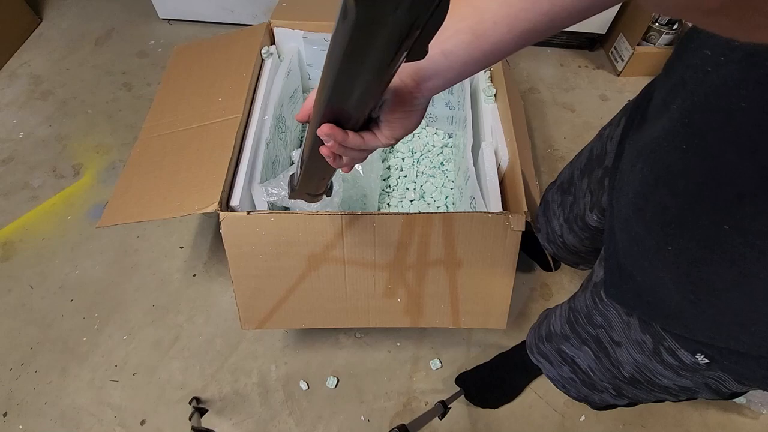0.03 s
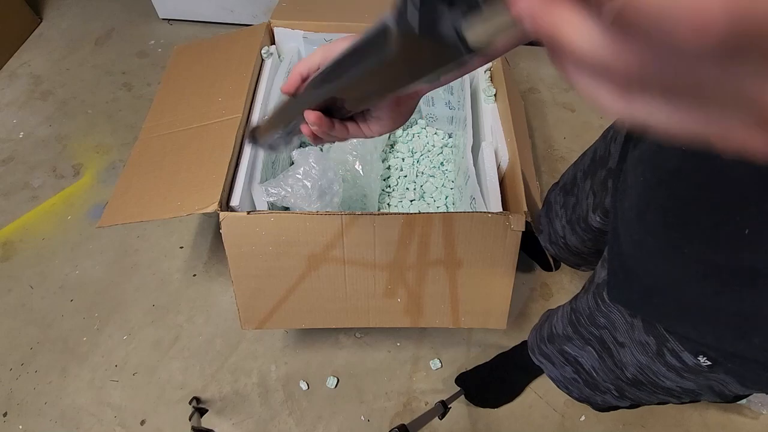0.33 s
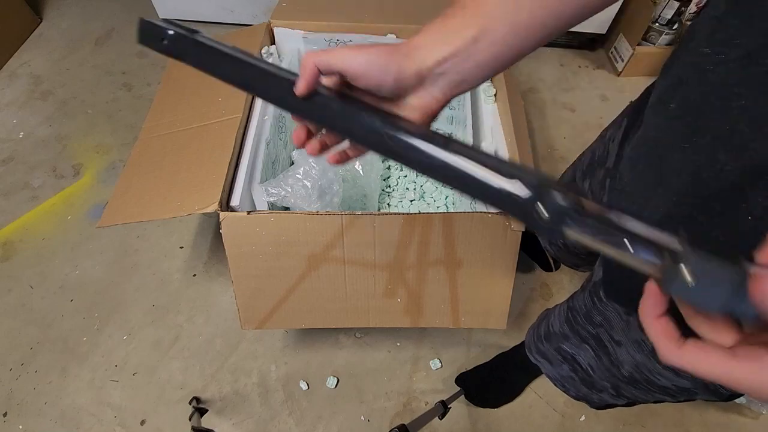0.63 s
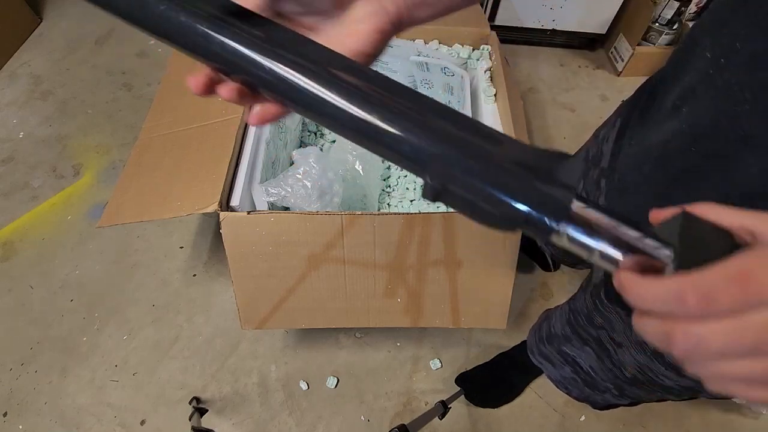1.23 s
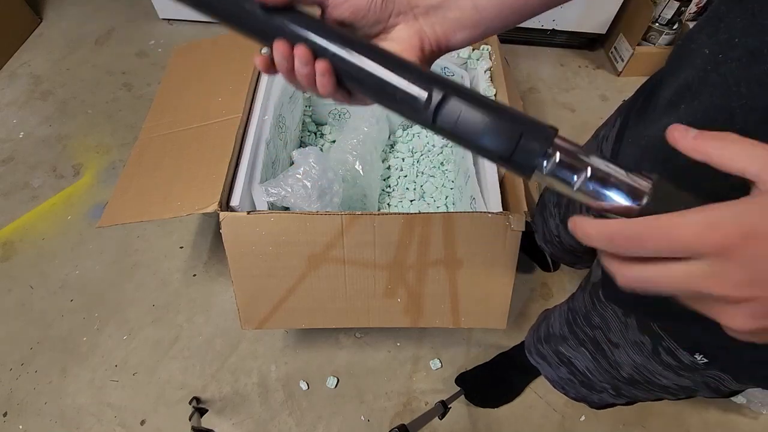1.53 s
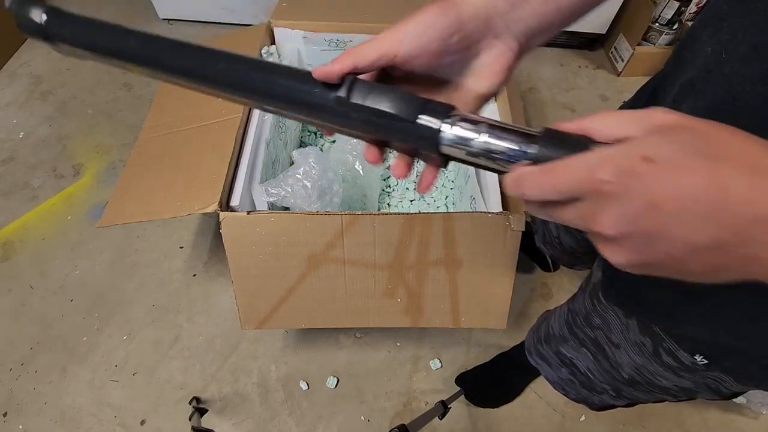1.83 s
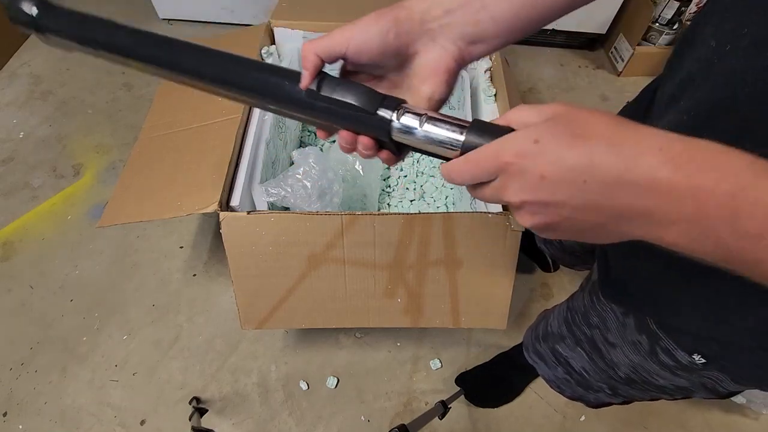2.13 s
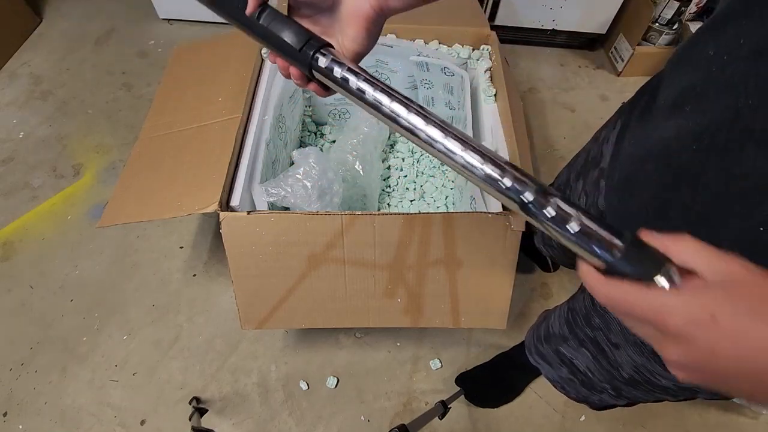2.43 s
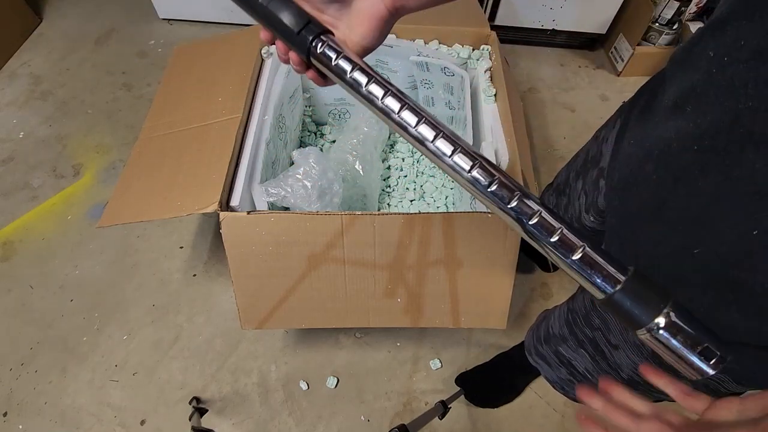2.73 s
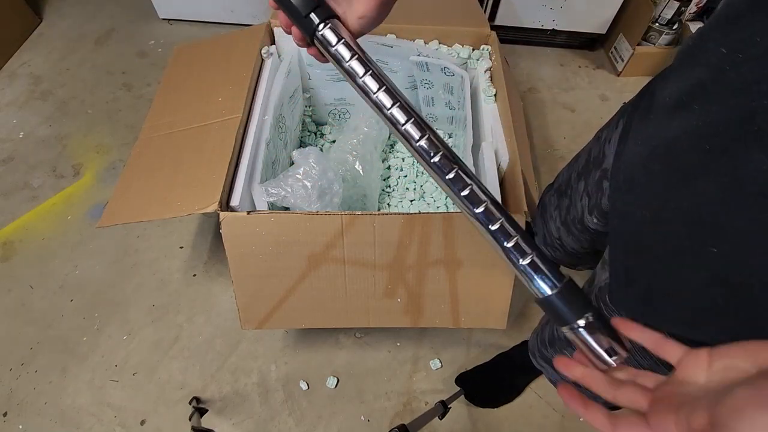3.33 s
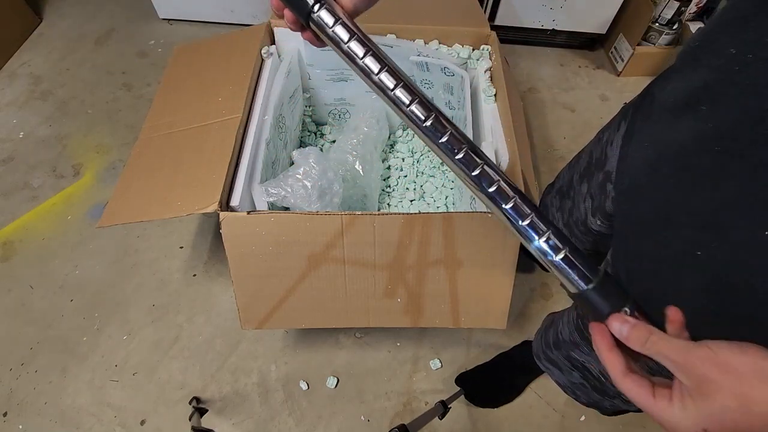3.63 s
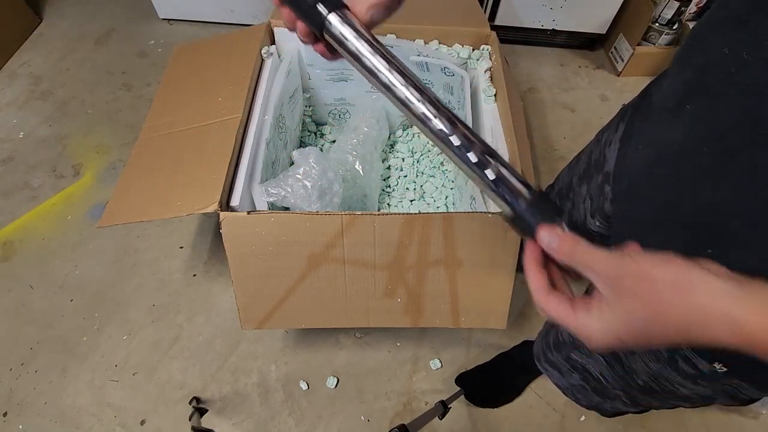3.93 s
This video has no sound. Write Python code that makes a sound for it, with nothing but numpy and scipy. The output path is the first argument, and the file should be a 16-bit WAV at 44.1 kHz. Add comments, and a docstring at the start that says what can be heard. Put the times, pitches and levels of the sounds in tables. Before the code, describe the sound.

A telescoping metal tube ratchets open close to the microphone after some soft handling. It clacks loudly against its stop, knocks twice in its plastic collar, then slides and clicks twice more, over a small room's low machine hum.

```python
"""Notched metal tube pulled out by hand

Close up, in a small hard-walled room with a machine humming. Hands rub and tap the tube; it slides
and its sprung catch rattles over the notches. It clacks against its end stop, knocks twice in its
plastic collar, slides again and clicks over two more notches. Metal contacts are a burst of chatter
plus the tube's modes; sliding and rubbing are dense tiny slips."""
import sys
import numpy as np
from scipy import signal
from scipy.fft import rfft, irfft
from scipy.io import wavfile

SR = 44100
rng = np.random.default_rng(int(sys.argv[2]) if len(sys.argv) > 2 else 0)


def wav_record(signal):
    """Record a signal, one row per channel, as 16-bit PCM in the file named by sys.argv[1]."""
    frames = np.transpose(np.atleast_2d(signal))
    bounded = np.clip(frames, -1, 1)
    # unit amplitude maps onto the largest positive 16-bit level
    quanta = np.round(bounded * 32767).astype(np.int16)
    wavfile.write(sys.argv[1], SR, quanta)


N = 176400
T = np.arange(N) / SR
HIT_T = T[:N // 16]
HIT_S = 0.005  # hit level = rms with all its energy in this span
FRICTION_WIDE_HZ = 4930

# spectrum of the catch on the tube (frequency [Hz], gain [dB])
CATCH_COLOUR = [(200, -19), (1100, -16), (2000, -1), (3300, -2.5), (5400, 0.5), (7500, 1), (8900, -2.5),
                (10000, -0.5), (13000, 1.5), (15500, -3.5)]
# spectrum of the end stop (frequency [Hz], gain [dB])
STOP_COLOUR = [(60, -14.5), (190, 1), (480, -16), (850, -9), (1070, -3.5), (1650, -6), (2100, -1),
               (2700, 2), (3050, -12), (3500, -1), (4200, -15), (5600, -9), (6400, -13), (6950, -18.5),
               (7700, -9), (10300, -8.5), (13000, -11.5), (13900, -20), (15500, -9)]


def undb(db):
    """Decibels to gain."""
    return 10 ** (np.asarray(db) / 20)


def unit(x):
    """Scale to a mean channel energy of 1."""
    return x / np.sqrt(np.mean(np.sum(x ** 2, axis=-1)))


def pan(db):
    """Stereo gains, left louder by db."""
    return undb(np.array([[db], [-db]]) / 2)


def at_hz(points, hz):
    """Read a table on a log-frequency axis."""
    knots_hz, values = np.array(points).T
    return np.interp(np.log(hz + 1), np.log(knots_hz), values)


def colour(x, points, tilt_db_oct=0):
    """Minimum-phase filter from a spectrum table, tilted above 500 Hz."""
    n = x.shape[-1]
    hz = np.fft.rfftfreq(n, 1 / SR)
    gain_db = at_hz(points, hz) + tilt_db_oct * np.log2(np.maximum(hz, 500) / 500)
    cepstrum = irfft(np.log(undb(gain_db)), n)
    return irfft(rfft(x) * np.exp(rfft(2 * cepstrum[:n // 2], n)), n)


def spread(pair, wide_hz):
    """Two unrelated signals to stereo: alike in the bass, unrelated above wide_hz."""
    n = pair.shape[-1]
    hz = np.fft.rfftfreq(n, 1 / SR)
    side = irfft(rfft(pair[1]) * hz / np.hypot(hz, wide_hz), n)
    return np.array([pair[0] + side, pair[0] - side])


def shape_noise(pair, points, wide_hz, tilt_db_oct=0):
    """Noise pair to coloured stereo, rms 1."""
    return unit(spread(colour(pair, points, tilt_db_oct), wide_hz)) * np.sqrt(pair.shape[-1])


def add(out, start_s, x):
    """Mix x in at start_s."""
    i = int(start_s * SR)
    out[:, i:i + x.shape[1]] += x[:, :N - i]


def contact_point(hz, scatter_db=3.5, step_hz=520):
    """Each place of contact favours its own resonances: random gain along frequency."""
    knots_hz = np.arange(0, SR / 2, step_hz)
    ripple = np.interp(hz, knots_hz, rng.standard_normal(len(knots_hz)))
    return undb(scatter_db * ripple * hz / np.hypot(hz, 2500))


def tube_ring(grip_per_s, detune=0.012, scatter_db=4):
    """Tube modes, varied per strike and damped further by the grip."""
    # free modes (frequency [Hz], level [dB], t60 [s])
    modes = [(1084, -2.5, 0.18), (1422, 1, 0.3), (1830, -8.5, 0.079), (2120, -10.5, 0.36),
             (2750, -13, 0.092), (3840, -2.5, .08), (5155, -3, 0.08), (5300, -1.5, .14), (7670, -2, 0.28),
             (7560, 1, 0.13), (10230, 0.5, 0.2), (11870, -1, .11), (15300, 7.5, .1), (15500, -6, .1)]
    ring = 0
    for hz, db, t60_s in modes:
        cycles = hz * (1 + detune * rng.standard_normal()) * HIT_T + rng.random((2, 1))
        gain = undb(db + scatter_db * rng.standard_normal())
        decay = np.exp(-np.log(1000) * HIT_T * (1 / t60_s + grip_per_s))
        ring = ring + gain * np.sin(2 * np.pi * cycles) * decay
    return ring


def hit(points, db, tilt_db_oct, decay_s, ring_db, wide_hz=3000, grip_per_s=20):
    """One contact: the faces chatter briefly and the tube rings."""
    n = len(HIT_T)
    envelope = np.exp(-HIT_T / decay_s) * (1 - np.exp(-2 * HIT_T / decay_s))
    chatter = rfft(rng.standard_normal((2, n)) * envelope)
    spectrum = contact_point(np.fft.rfftfreq(n, 1 / SR)) * chatter / np.abs(chatter)
    crack = irfft(spectrum, n) * np.exp(-HIT_T / (10 * decay_s))
    strike = unit(crack) + undb(ring_db) * unit(tube_ring(grip_per_s))
    stereo = spread(colour(strike, points, tilt_db_oct), wide_hz)[:, :n // 2]
    return np.array([unit(side) for side in stereo]) * undb(db) * np.sqrt(HIT_S * SR)


def friction(curve, points, grain_db, rate_hz):
    """Dense tiny slips of uneven size under a level curve; silent outside it."""
    grain_index = np.linspace(0, T[-1] * rate_hz, N // 10)
    coarse_grain = np.interp(grain_index, np.arange(N), rng.standard_normal(N))
    grain = np.interp(T, np.linspace(0, T[-1], N // 10), coarse_grain)
    slips = rng.standard_normal((2, N)) * undb(grain_db * grain)
    times_s, db = np.array(curve).T
    envelope = undb(np.interp(T, times_s, db)) * (T >= times_s[0]) * (T <= times_s[-1])
    return shape_noise(slips, points, FRICTION_WIDE_HZ) * envelope


def background():
    """Ventilation noise and steady motor hum."""
    # ventilation spectrum (frequency [Hz], relative density [dB])
    air_colour = [(22, -29), (38, -18), (52, 1), (80, -2), (150, -3.5), (210, 2), (290, -4.5), (360, -5),
                  (500, -10.5), (700, -7.5), (950, -17.5), (1450, -20), (2500, -31.5), (5000, -40.5),
                  (7500, -44.5), (9500, -60), (16000, -58.5)]
    # motor tones (frequency [Hz], level [dB])
    tones = [(58.5, -54.5), (117.2, -58.5), (198, -61), (358, -63.5), (644, -70.5), (704, -68.5)]
    air = shape_noise(rng.standard_normal((2, N)), air_colour, wide_hz=553) * undb(-50)
    hum = sum(np.sqrt(2) * undb(db) * np.sin(2 * np.pi * (hz * T + rng.random())) for hz, db in tones)
    return air + hum


def hands():
    """Fingers rub along the tube, tap it and scuff it as they change grip."""
    # rubbing (time [s], level [dB])
    rub = [(.42, -79), (.56, -63.5), (.72, -76), (.88, -68.5), (1.05, -68.5), (1.19, -63), (1.33, -58),
           (1.47, -61), (1.51, -68.5), (1.68, -61.5), (1.8, -61.5), (2.1, -58.5), (2.2, -53), (2.27, -90)]
    # spectrum of skin on metal (frequency [Hz], gain [dB])
    rub_colour = [(300, 10), (1300, 4), (2500, -1), (4500, -4.5), (7500, -6), (8800, -11.5), (12500, -18.5),
                  (15500, -15)]
    # taps of fingers and fittings (time [s], level [dB], tilt [dB/oct])
    taps = [(0.545, -60, 1), (0.927, -56.5, -1.5), (1.2982, -40, 2.5), (1.48, -56.5, 0), (1.7024, -56, -2),
            (1.7468, -54, -2.5), (1.77, -40.5, 0.5), (2.168, -48, -7.5), (2.309, -41, -3.5),
            (2.7372, -35.5, 2), (2.748, -45, -7.5), (2.885, -66, 2.5), (3.6575, -38, .7), (3.67, -43.5, 1),
            (3.748, -52, 1), (3.842, -54, 0)]
    # tap spectrum (frequency [Hz], gain [dB])
    tap_colour = [(150, -10.5), (400, -16.5), (1100, 2.5), (2400, 4.5), (3200, 1.5), (5200, 4),
                  (7500, -0.5), (9000, -1), (15500, -10.5)]
    # skin scuffs (peak time [s], half length [s], level [dB], tilt [dB/oct])
    scuffs = [(0.543, .016, -55.5, 7.5), (0.622, 0.032, -62, 13), (0.773, 0.021, -63, 3.5),
              (.828, 0.022, -57, 10), (1.295, .01, -46.5, -0.5), (1.435, 0.039, -60.5, 6),
              (1.606, 0.039, -55.5, -2.5), (1.786, 0.035, -54, 0), (1.869, .025, -56, 8.5),
              (2.285, 0.027, -54, 1)]
    out = friction(rub, rub_colour, grain_db=1.5, rate_hz=300)
    for time_s, db, tilt_db_oct in taps:
        add(out, time_s, hit(tap_colour, db, tilt_db_oct, decay_s=0.0015, ring_db=-9))
    centre_s = HIT_T[-1] / 2
    for peak_s, half_s, db, tilt_db_oct in scuffs:
        hiss = shape_noise(rng.standard_normal((2, len(HIT_T))), rub_colour, FRICTION_WIDE_HZ, tilt_db_oct)
        swell = np.exp(-((HIT_T - centre_s) / half_s) ** 2)
        add(out, peak_s - centre_s, hiss * undb(db) * swell)
    return out


def sliding():
    """Metal scrapes in the sleeve: a long pull, later a short nudge."""
    # pull (time [s], level [dB])
    pull = [(2.28, -67), (2.3, -48), (2.37, -38), (2.47, -40.5), (2.58, -39), (2.63, -53.5), (2.68, -72.5),
            (2.725, -74.5), (2.755, -47.5), (2.81, -80)]
    # nudge (time [s], level [dB])
    nudge = [(3.61, -84), (3.655, -46), (3.71, -46.5), (3.76, -68.5), (3.82, -75), (3.87, -51),
             (3.92, -47.5), (4, -36)]
    # nudge spectrum (frequency [Hz], gain [dB])
    nudge_colour = [(300, 0.5), (1200, -1), (2400, -1), (5200, -2.5), (6200, -2.5), (7500, 6), (8600, -7),
                    (10800, -4), (12400, -2), (14000, -4.5), (15600, -6.5)]
    scrape = friction(pull, CATCH_COLOUR, grain_db=0.5, rate_hz=600)
    return scrape + friction(nudge, nudge_colour, grain_db=4, rate_hz=210)


def collar_knocks():
    """The tube knocks in its plastic collar: a hollow, fast-dying thud plus a metal tick."""
    # knocks (time [s], thud level [dB], tick level [dB], thud pitch [ratio])
    knocks = [(1.179, -46.5, -63, 1.3), (1.2195, -55, -68, 1), (1.2982, -45, -60, 0.283),
              (1.5876, -56, -63, 1.06), (1.7815, -54, -61, 1.4), (1.7975, -49.5, -55, 1.1),
              (2.1411, -31, -40.5, 1.05), (2.2013, -51, -74, 1.2), (2.915, -50.5, -50.5, 1),
              (2.9295, -57.5, -65, 1.04), (3.2884, -25, -30.5, 0.98), (3.3189, -28.5, -25.5, 0.95)]
    # collar spectrum at pitch 1 (frequency [Hz], gain [dB])
    collar_colour = [(150, -21.5), (900, -21.5), (1300, -6.5), (1900, 1), (2550, -1), (3100, -19),
                     (3700, -15.5), (6000, -31.5), (15000, -53.5)]
    push = signal.unit_impulse((1, len(HIT_T)))
    out = np.zeros((2, N))
    for time_s, thud_db, tick_db, pitch in knocks:
        shifted = [(hz * pitch, db) for hz, db in collar_colour]
        thud = colour(push, shifted)[:, :len(HIT_T) // 2]
        add(out, time_s, unit(thud) * undb(thud_db) * np.sqrt(HIT_S * SR))
        tick = hit(CATCH_COLOUR, tick_db, tilt_db_oct=-5, decay_s=0.0013, ring_db=-8, grip_per_s=45)
        add(out, time_s, tick)
    return out


def end_stop():
    """The collar touches, then is struck hard; loose parts shudder."""
    # contacts (time [s], level [dB], tilt [dB/oct])
    contacts = [(3.011, -40, -2.5), (3.0174, -35, -5), (3.023, -13.5, 0.5)]
    # loose parts (time [s], level [dB])
    shudder = [(3.008, -50.5), (3.021, -33.5), (3.031, -29.5), (3.05, -31), (3.075, -47), (3.11, -67)]
    out = friction(shudder, STOP_COLOUR, grain_db=-2, rate_hz=1100)
    for time_s, db, tilt_db_oct in contacts:
        clack = hit(STOP_COLOUR, db, tilt_db_oct, decay_s=0.0012, ring_db=-10.5, wide_hz=4500,
                    grip_per_s=34)
        add(out, time_s, clack)
    return out


def ratchet(rebound_s=0.0024):
    """The sprung catch snaps into each notch and rebounds once, with less ring."""
    # catch drops (time [s], level [dB], tilt [dB/oct], relative rebound level [dB])
    notches = [(2.2908, -34.5, 1, -13), (2.2955, -29, -3.5, -36.5), (2.3354, -24, -1, -2),
               (2.3632, -26, -2, -7.5), (2.386, -31.5, -1, -10), (2.406, -25, -1.5, -2),
               (2.4412, -21, .5, -7.5), (2.4777, -22.5, -0.5, -1), (2.5135, -39, -3, -5.5),
               (2.5188, -20, 0.5, -13), (2.5421, -19.5, 3.5, -14), (2.5567, -29, 2.5, -19.5),
               (2.573, -19.5, 3, -7), (2.635, -32.5, 1.5, -7), (2.6452, -46, -8, -14),
               (3.929, -22, 1, -1.5), (3.9783, -22, 5.5, 0.5)]
    out = np.zeros((2, N))
    for time_s, db, tilt_db_oct, rebound_db in notches:
        snap = hit(CATCH_COLOUR, db, tilt_db_oct, decay_s=0.00088, ring_db=-6.5, grip_per_s=16)
        rebound = hit(CATCH_COLOUR, db + rebound_db, tilt_db_oct + 0.5, decay_s=0.0014, ring_db=-20)
        add(out, time_s, snap)
        add(out, time_s + rebound_s, rebound)
    return out


def room(x, tail_db=-7, build_s=0.002):
    """Near reflections and a diffuse tail whose treble dies first."""
    # reverberation (frequency [Hz], t60 [s])
    decays = [(150, 1.8), (1000, 0.45), (2500, 0.4), (6000, 0.3758), (10000, 0.24), (16000, 0.29)]
    # reflections off floor, box and body (delay [s], level [dB])
    echoes = [(.0052, -16), (.0083, -14.5), (0.0101, -15), (0.0153, -19.5)]
    t = T[:N // 5]
    hz = np.fft.rfftfreq(len(t), 1 / SR)
    noise = rfft(spread(rng.standard_normal((2, len(t))), wide_hz=900))
    tail = 0
    for centre_hz, t60_s in decays:
        band = at_hz([(knot_hz, knot_hz == centre_hz) for knot_hz, _ in decays], hz)
        tail = tail + irfft(noise * band, len(t)) * np.exp(-np.log(1000) * t / t60_s)
    response = undb(tail_db) * unit(tail * (1 - np.exp(-t / build_s)))
    for delay_s, db in echoes:
        for side in response:
            jitter = 1 + 0.04 * rng.standard_normal()
            side[int(delay_s * SR * jitter)] += undb(db)
    return signal.fftconvolve(x, response, axes=1)[:, :N]


def scene():
    """Catch, sliding and hands to the left, clacks nearer the middle; room and background added."""
    handling = ratchet() + sliding() + hands()
    clacks = end_stop() + collar_knocks()
    reverb = room(handling + undb(-1.8) * clacks)
    return handling * pan(db=5.5) + clacks * pan(db=3.5) + reverb * pan(db=1) + background() * pan(db=2)


def record(dry):
    """Steep low-pass at 15.9 kHz."""
    return signal.sosfilt(signal.ellip(10, 0.2, 70, 15900, fs=SR, output="sos"), dry)


dry = scene()
out = record(dry)
wav_record(out)
```